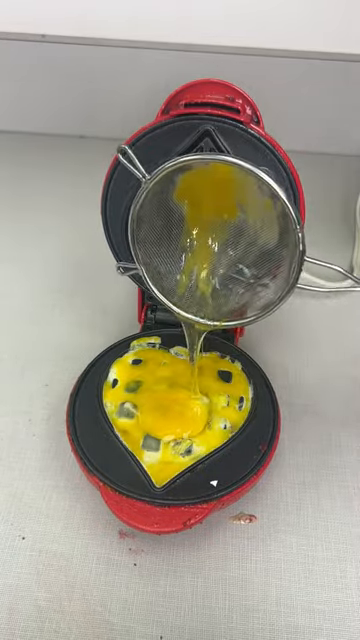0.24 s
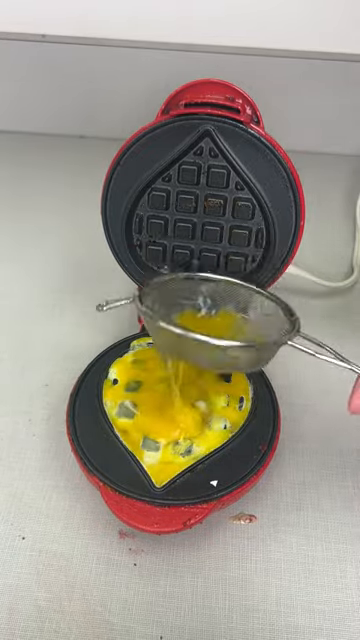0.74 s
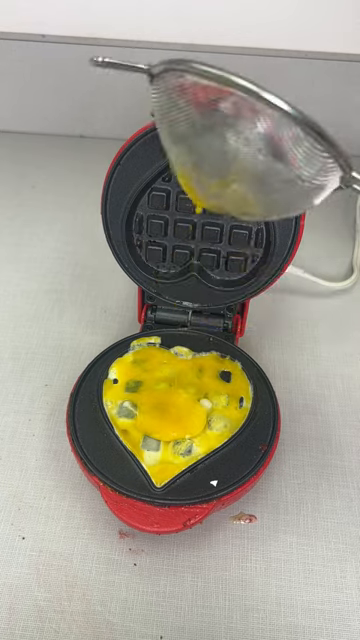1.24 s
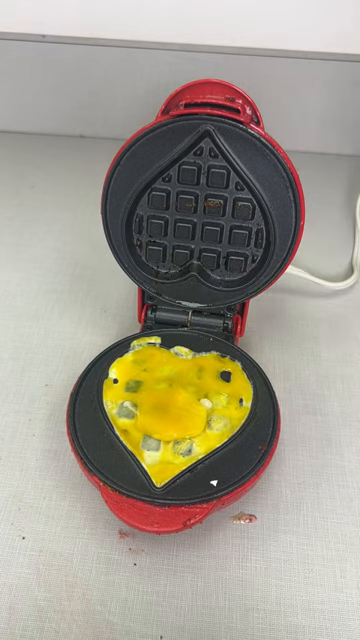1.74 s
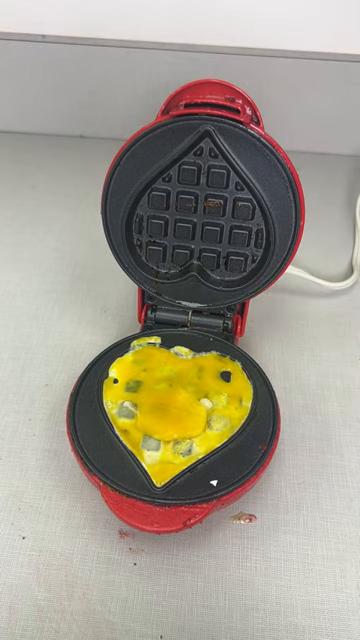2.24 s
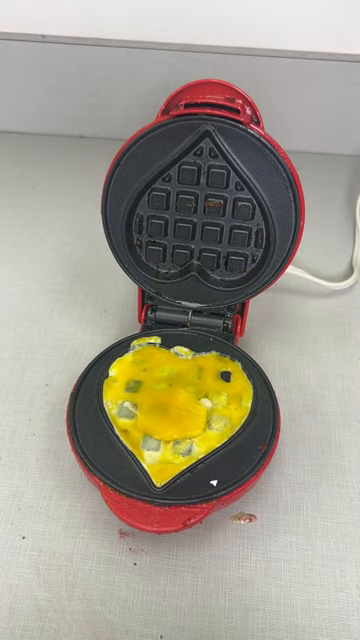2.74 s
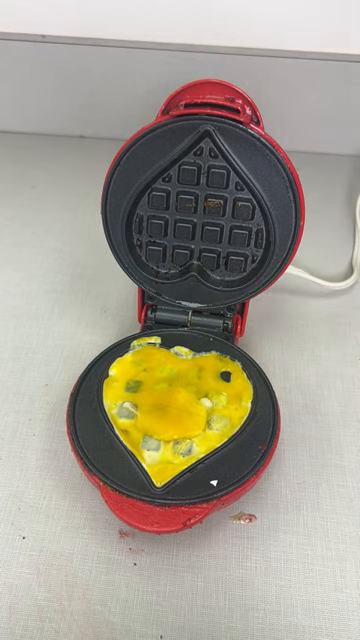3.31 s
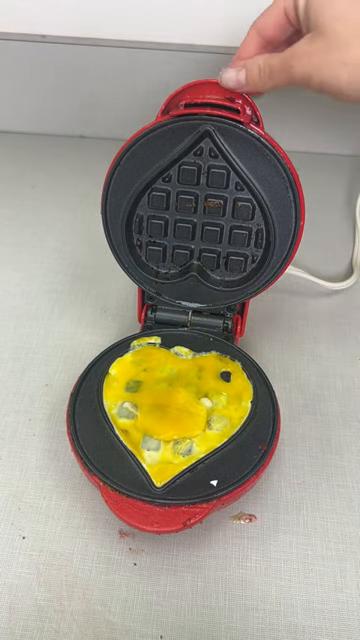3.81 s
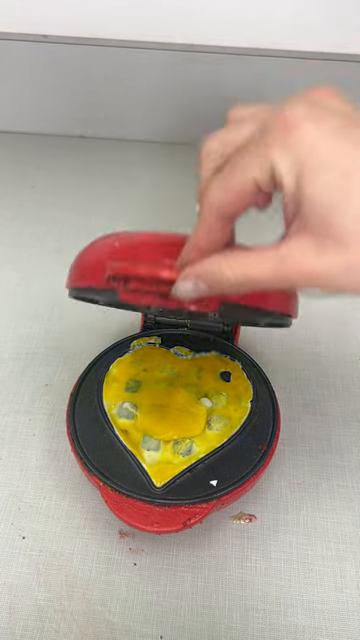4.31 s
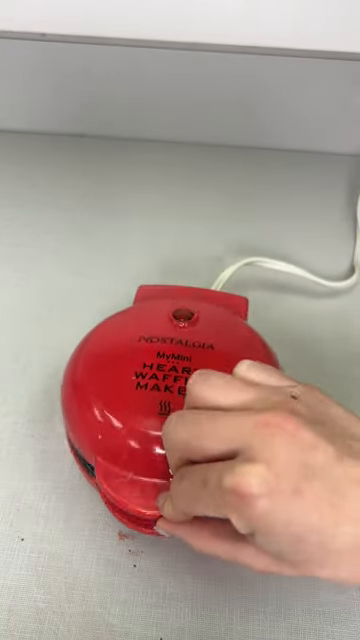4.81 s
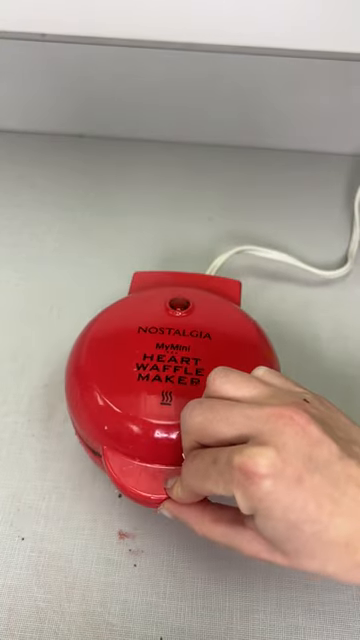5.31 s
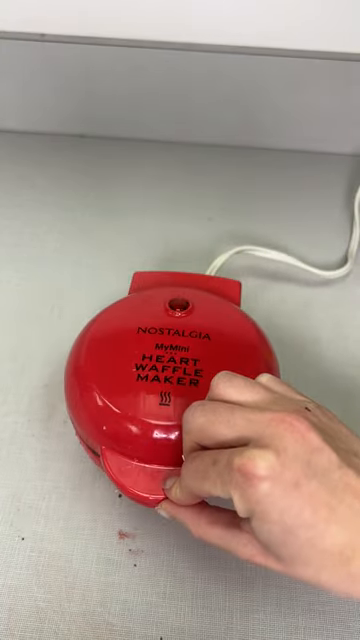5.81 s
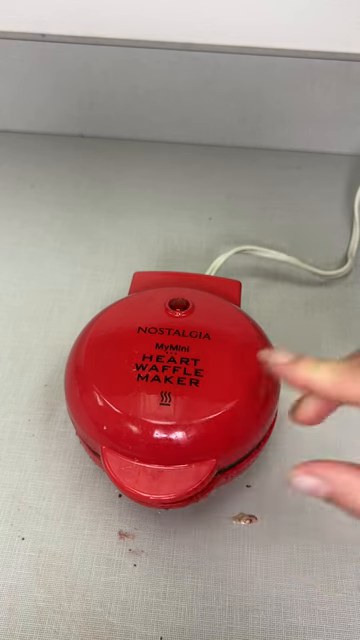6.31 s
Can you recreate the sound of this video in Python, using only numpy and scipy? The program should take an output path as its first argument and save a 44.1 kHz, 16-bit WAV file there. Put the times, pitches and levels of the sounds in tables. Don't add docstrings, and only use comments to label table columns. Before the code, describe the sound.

Close in a small kitchen with a low refrigerator hum, egg crackles weakly on an open hot plate and dies down. A wire sieve scrapes briefly and lands with a bright, sharp clack to the right. A hand knocks a small hollow lid loose and swings it over with light taps. The lid presses the egg; steam hisses and spurts between the metal plates, then fades to a thin sputter.

```python
import sys
import numpy as np
from scipy import signal
from scipy.fft import rfft, irfft, next_fast_len
from scipy.io import wavfile
from scipy.ndimage import uniform_filter1d

SR = 44100
rng = np.random.default_rng(int(sys.argv[2]) if len(sys.argv) > 2 else 0)


def makeup_ratio(level_db):
    decades = np.asarray(level_db, float) / 20
    return 10 ** decades


def inscribe(sig):
    pcm = np.round(np.clip(np.atleast_2d(sig).T, -1, 1) * 32767)
    wavfile.write(sys.argv[1], SR, pcm.astype(np.int16))


N = 288855
SIZE = next_fast_len(N + SR)
HZ = np.maximum(np.fft.rfftfreq(SIZE, 1 / SR), 1)

# pitch in Hz, level in dB per Hz.
SLIDE_TONE = [(240, -32.5), (400, -9), (470, -8.5), (503, -24), (538, -5), (806, -1), (1100, -21.5),
              (1990, -10.5), (10000, -19), (13000, -61), (22000, -120)]
# start in seconds, body in dB, mesh in dB, time to die by 60 dB in s.
SIEVE_CATCHES = [
    (2.709, -45, -52, 0.19),
    (2.748, -51.5, -66, 0.28),
    (2.794, -46.5, -52.5, 0.055),
    (2.808, -55, -46, .03),
    (2.857, -50, -66, 0.07),
    (2.881, -53, -47, 0.099),
]
# time in seconds, peak in dB.
CLACK = [
    (2.9112, -39),
    (2.9134, -16),
    (2.9148, -24),
    (2.9172, -28),
    (2.9222, -28),
    (2.958, -40),
]
# pitch in Hz, level in dB.
SIEVE_WIRE = [(710, -2), (785, -3.5), (1035, 1), (1230, 5.5), (1365, -3), (1590, -4), (1695, 0),
              (2265, 2.5), (2395, 9), (2860, 3), (3425, -2.5), (5250, -1.5), (6500, -21), (7450, -16)]
# pitch in Hz, level in dB, time to die by 60 dB in seconds.
SIEVE_BOWL = [(329.5, -17, 0.24), (502, -34, 0.093)]
# pitch in Hz, level in dB per Hz.
WALL_CRACK = [(150, -6.5), (300, 2), (600, 4.5), (1200, -3), (2800, -1), (4200, -13), (7000, -20.5),
              (15500, -49)]
# time in seconds, force in dB, then rim, fingernail and weight on the counter,
# each in dB over the force.
KNOCKS = [(2.02, -54.5, -24, -16, -12), (3.868, -41, -6.5, -8.5, -3.5), (3.963, -47, -1, -2.5, 11),
          (3.994, -28.5, -7, -34.5, -6), (4.097, -40, -15.5, -30, -1), (4.152, -45, -14.5, -19, 3),
          (4.268, -39, -14, -24, 2), (4.344, -42.5, -14.5, -24, -3), (4.468, -44, -4, -63, -12),
          (6.138, -52.5, -1.5, -18, 6)]
# pitch in Hz, level in dB, time to die by 60 dB in seconds.
LID_SHELL = [(390, -13.5, 0.016), (490, 3, 0.035), (619, -3, 0.032)]
# pitch in Hz, level in dB, time to die by 60 dB in seconds.
LID_RIM = [(798, -2, 0.032), (967, -4, 0.027)]
# pitch in Hz, level in dB, time to die by 60 dB in seconds.
LID_HINGE = [(1260, 0.5, 0.0093), (1670, -9, 0.021), (1990, 0.5, 0.0095)]
# time in seconds, worktop in dB, deep rocking in dB.
THUDS = [(2.749, -51, -61), (2.916, -25.5, -39), (2.949, -30.5, -39), (4.0, -48, -39.5), (4.042, -42, -49),
         (4.77, -46, -51), (4.986, -53, -68), (5.032, -58, -44), (5.07, -43, -44), (5.143, -46.5, -55),
         (6.147, -52, -56)]
# pitch in Hz, level in dB, time to die by 60 dB in seconds.
WORKTOP = [(138, 9.5, 0.14), (197.4, -2, 0.12), (239, -12.5, 0.09), (326.5, -8, 0.11), (415, -19, 0.053)]
# pitch in Hz, level in dB, time to die by 60 dB in seconds.
IRON_ROCKING = [(65, -1, 0.22), (84.7, -1.5, 0.052)]
# time in seconds, level in dB.
STEAM_PRESSURE = [(4.935, -85), (4.958, -62), (4.995, -53), (5.09, -47.5), (5.165, -47.5), (5.2, -50.5),
                  (5.45, -56), (5.95, -66), (6.55, -64.5)]
# pitch in Hz, level in dB per Hz.
STEAM_TONE = [(1060, -107), (1800, -44), (2230, -6), (3320, -1.5), (4460, 5.5), (5130, -0.5), (6550, 1),
              (7050, 3), (10500, -5), (13600, -39), (22000, -120)]
# pitch in Hz, width in Hz, level in dB.
PLATES = [(827, 26, 12.5), (1100, 92, 6.5), (1267, 89, 6.5), (1970, 55, -3), (4080, 34, 7), (4460, 60, 2),
          (6100, 160, 4), (6900, 26, 3), (8120, 240, 3.5), (11170, 140, 2.5)]
# time in seconds, peak in dB, whistle pitch in Hz.
SPURTS = [(4.958, -49, 7400), (4.991, -39, 7240), (5.032, -41, 12400), (5.092, -33.5, 4570),
          (5.151, -33, 4460), (5.624, -44, 6130), (5.647, -42.5, 4450), (5.815, -42.5, 8000),
          (6.05, -52, 11100), (6.129, -42.5, 6260), (6.21, -50.5, 8800), (6.27, -44.5, 4300),
          (6.49, -46, 6200)]
# time in seconds, level in dB.
FRYING = [
    [(0.0, -63.5), (0.31, -62.5), (0.43, -63.5), (0.54, -65), (0.81, -67.5), (2.04, -73.5), (2.68, -73.5)],
    [(3.2, -72), (3.268, -80), (3.51, -75.5), (3.744, -72), (4.184, -78.5), (4.49, -81.5), (4.95, -83.5)],
]
# pitch in Hz, level in dB per Hz.
SIZZLE_TONE = [(880, -61), (1500, -45), (1730, 0), (1840, -6.5), (2000, 3), (2130, -22), (2510, 0.5),
               (2950, -3.5), (4140, -2.5), (5090, -8), (5740, -2), (6620, -4.5), (8330, -9.5), (10000, -28),
               (13000, -37), (22000, -120)]
# time in seconds, peak in dB, brightness in dB over the peak.
POPS = [(0.0732, -51, -13), (0.151, -47, -17), (0.157, -44, -19), (0.2325, -50, -11), (0.2813, -43, -15.5),
        (0.3162, -48, -18), (0.3483, -47.5, -9), (0.3775, -53, -17), (0.4293, -41, -31), (0.4697, -50, -18),
        (0.5065, -45.5, -12), (0.5342, -49.5, -9), (0.618, -46, -11), (0.7701, -48, -30), (0.874, -47, -27),
        (1.2182, -45, -34), (1.4544, -42.5, -41), (1.5753, -45.5, -37), (2.0542, -52.5, -22),
        (2.387, -42.5, -54), (2.5143, -56, -27), (2.6446, -52, -26), (3.1887, -65, -6), (3.2377, -68, -6),
        (3.2909, -46.5, -48), (3.6674, -56, -22), (4.117, -53, -30), (4.2602, -53, -30)]
# pitch in Hz, level in dB rms.
HUM = [(120, -58), (240, -74), (360, -75.5), (600, -81), (720, -80.5), (960, -86.5)]
# pitch in Hz, width in Hz, level in dB rms.
FRIDGE_DRONE = [(65, 2.8, -64.5), (1959, 32, -77)]
# pitch in Hz, level in dB per Hz.
ROOM_RUMBLE = [(15, -46), (25, -7), (122, -5), (145, -15), (173, -12.5), (244, -14.5), (312, -18.5),
               (358, -17), (434, -16), (593, -18.5), (659, -21.5), (719, -20.5), (885, -25), (1600, -32),
               (2080, -52), (3520, -120)]
# pitch in Hz, likeness (1 is the same).
AIR_LIKENESS = [(60, 1), (130, 0.77), (290, 0.63), (640, -1), (1410, 0.48), (3100, 1.07), (6820, 0.5),
                (15000, -5)]
# pitch in Hz, level in dB per Hz.
FAR_FAN = [(820, -22), (1400, -24), (1730, -17), (1880, -19.5), (2080, -5.5), (2520, -11.5), (2790, -12.5),
           (3030, -22), (3740, -17.5), (4920, -38), (8600, -36), (9420, -38.5), (15800, -48)]
# pitch in Hz, time to die by 60 dB in seconds.
KITCHEN_ECHO = [(125, 0.22), (250, 0.65), (500, 0.5), (1000, 0.43), (2000, 0.41), (4000, 0.42),
                (8000, 0.29), (14000, 0.48)]
# pitch in Hz, side minus mid in dB.
PORTS_RIGHT = [(60, -28), (110, -35), (200, -12), (380, -11.5), (700, 2), (1290, -3.5), (2380, -6),
               (4400, -2), (8120, -2.5), (15000, 0)]
# pitch in Hz, side minus mid in dB.
PORTS_FRONT = [(60, -23.5), (110, -50), (200, -19.5), (380, -23), (700, -10.5), (1290, -21), (2380, -17),
               (4400, -8), (8120, -2), (15000, 0)]
# pitch in Hz, phase in radians.
PORT_TURN = [(100, 3.4), (400, 2), (700, 2.2), (1300, 1.94), (2400, 1.57), (4400, 1.46), (15000, 1.63)]


def sieve():
    start_s, attack_s, end_s = 2.702, 0.0039, 3.03
    slide_db, mesh_db = -53.5, -70.5
    body, mesh = gains([(start_s, slide_db - 27, mesh_db - 6),
                        (start_s + attack_s, slide_db, mesh_db),
                        (end_s, slide_db - 13.5, mesh_db)])
    grit = grains(4000 * makeup_ratio(10.0 * drift(30)), 3.4)
    slide = body * rms_one(shaped(grit, makeup_ratio(at_hz(SLIDE_TONE))))
    slide += mesh * rms_one(band(grit, 11300, 15000))
    for s, body_db, catch_mesh_db, t60 in SIEVE_CATCHES:
        slide += band(puffs([s], [body_db], t60), 600, 9000)
        slide += band(puffs([s], [catch_mesh_db], t60), 8900, 17000)

    s, db = np.transpose(CLACK)
    blow_s, blow_db = s[1:2], db[1:2]
    wire_t60_s = 0.03
    wire_modes = [(hz, level_db, wire_t60_s) for hz, level_db in SIEVE_WIRE]
    wire = struck(wire_modes, s, db - 9.0, scatter_db=3.0)
    crack = band(puffs(s, db - 3.5, 0.033), 920, 4860)
    crack += band(puffs(s, db - 15, 0.014), 3600, 16000)
    bowl = band(puffs(s + 0.0013, db - 3, 0.16), 250, 450)
    bowl += struck(SIEVE_BOWL, blow_s + 0.0048, blow_db, 0)
    wall_blow = shaped(clicks(blow_s + 0.0045, blow_db), makeup_ratio(at_hz(WALL_CRACK)))
    return slide + wire + crack + bowl, wall_blow


def lid():
    s, db, rim_db, nail_db, _ = np.transpose(KNOCKS)
    hinge_db = db + 11.5 + rim_db + 0.33 * (nail_db - rim_db)
    shell = struck(LID_SHELL, s, db + 0.5, 1.5)
    shell += struck(LID_RIM, s, db + rim_db + 7, 0.89)
    shell += struck(LID_HINGE, s, hinge_db, 0.52)
    carried = through_counter(band(shell, 250, 1580), path=0.5)
    rattle = band(puffs(s + 0.0054, db + 3.0, 0.073), 440, 820)
    nail = puffs(s, db + nail_db + 12, 0.036)
    nail_click = band(nail, 2200, 3800) + makeup_ratio(-10) * band(nail, 3800, 5700)
    return carried + rattle + nail_click


def counter():
    knock_thuds = []
    for s, force_db, _, _, weight_db in KNOCKS:
        press_db = force_db + weight_db
        knock_thuds.append((s, press_db - 2, press_db + 0.5))
    s, top_db, deep_db = np.transpose(THUDS + knock_thuds)
    boom = struck(WORKTOP, s, top_db - 6.5, scatter_db=0.5)
    boom += struck(IRON_ROCKING, s, deep_db, scatter_db=6.5)
    return through_counter(band(boom, 68, 1400))


def steam():
    hiss, = gains(STEAM_PRESSURE)
    pressure = hiss / makeup_ratio(-52)
    since_press = np.arange(N) / SR - STEAM_PRESSURE[0][0]
    ring = makeup_ratio(np.interp(since_press, [0, 0.7], [-24, -8]))
    sputter = grains(2500 * makeup_ratio(4.5 * drift(25)), 2.43)
    smooth_hiss = 1.1 * rng.standard_normal(N)
    jet = in_front(rms_one(sputter + smooth_hiss), diffuse_db=-3)
    jet = jet * makeup_ratio(1.0 * drift(30))

    plates = 0
    for hz, width, db in PLATES:
        resonance = 1 / (1 + (2 * (HZ - hz) / width) ** 2)
        plates = plates + makeup_ratio(db + 2.7 * drift(5)) * shaped(jet, resonance)
    plates = rms_one(plates) * ring * makeup_ratio(1.9 * drift(8))
    rush = rms_one(shaped(jet, makeup_ratio(at_hz(STEAM_TONE))))
    main = makeup_ratio(3.0) * hiss * (rush + plates)
    shudder = makeup_ratio(-62.5) * pressure ** 1.8 * rms_one(band(band(jet, 88, 180), 88, 184))
    gurgle = makeup_ratio(-57) * pressure ** 0.99 * rms_one(band(jet, 310, 3430))
    fine = makeup_ratio(-54 + 1.4 * drift(12)) * pressure ** 1.3 * rms_one(band(jet, 10700, 19000))
    return main + shudder + gurgle + fine + spurts()


def spurts():
    burst_t60_s, whistle_t60_s, attack_s = 0.039, 0.03, 0.003
    width = 0.076
    s, db, _ = np.transpose(SPURTS)
    out = band(puffs(s, db - 4, burst_t60_s, attack_s), 1700, 8800)
    for s, db, hz in SPURTS:
        breath = puffs([s], [db + 5], whistle_t60_s, attack_s)
        out += band(breath, hz * (1 - width), hz * (1 + width))
    return ports(out, PORTS_FRONT)


def frying():
    sizzle, = gains(np.concatenate(FRYING))
    vigour = sizzle / makeup_ratio(-64)
    spit = makeup_ratio(-73.5) * vigour ** 1.8 + makeup_ratio(-81) * vigour ** 0.28
    fizz = in_front(grains(3500 * makeup_ratio(2.0 * drift(25)), 2.5), diffuse_db=-0.5)
    body = rms_one(shaped(fizz, makeup_ratio(at_hz(SIZZLE_TONE))))
    upper = shaped(body, 1 / (1 + (5090 / HZ) ** 12))
    top = shaped(body, 1 / (1 + (7240 / HZ) ** 12))
    patch_db = 2.5
    upper_patches = (upper - top) * makeup_ratio(patch_db * drift(6))
    top_patches = top * makeup_ratio(1.5 + patch_db * drift(4)) * (vigour * makeup_ratio(5)) ** 0.38
    body = body - upper + upper_patches + top_patches
    fine = rms_one(band(band(fizz, 6300, 19000), 5800, 26000)) * makeup_ratio(1.7 * drift(15))
    return makeup_ratio(2) * sizzle * body + spit * fine + ports(pops(POPS), PORTS_FRONT)


def pops(rows):
    s, peak_db, bright_db = np.transpose(rows)
    t60_s = 0.011
    low = band(puffs(s, peak_db, t60_s), 1760, 4400)
    middle = band(puffs(s, peak_db + 0.57 * bright_db + 11, t60_s), 5100, 8100)
    high = band(puffs(s, peak_db + bright_db + 10.5, t60_s), 7500, 16000)
    return low + middle + high


def fridge():
    t = np.arange(N) / SR
    hum = np.zeros(N)
    for hz, db in HUM:
        hum += makeup_ratio(db + 4 + 1.0 * drift(4)) * np.sin(2 * np.pi * hz * t + rng.uniform(0, 4.9))
    hum = hum * makeup_ratio(np.array([[-0.3], [0.3]]))
    air = spread(rng.standard_normal(N), AIR_LIKENESS)
    drone = 0
    for hz, width, db in FRIDGE_DRONE:
        drone = drone + makeup_ratio(db) * rms_one(shaped(air, 1 / (1 + ((HZ - hz) / width) ** 2)))
    rumble = rms_one(shaped(air, makeup_ratio(at_hz(ROOM_RUMBLE))))
    fan = rms_one(shaped(air, makeup_ratio(at_hz(FAR_FAN)))) * makeup_ratio(0.27 * drift(0.4))
    return hum + drone + makeup_ratio(-60) * rumble + makeup_ratio(-72) * fan


def kitchen(x):
    t = np.arange(SR) / SR
    white = rng.standard_normal((2, SR)) * np.clip((t - 0.003) / 0.0021, 0, 1)
    tail = 0
    for hz, t60 in KITCHEN_ECHO:
        tail = tail + band(white, hz / np.sqrt(2), hz * np.sqrt(2)) * makeup_ratio(-60 * t / t60)
    mono_bass = band(tail.mean(axis=0), 40, 340)
    return shaped(x, rfft(band(tail, 404, 18000) + mono_bass, SIZE))


def through_counter(x, path=1):
    travel_s = 0.01229
    lead = travel_s * np.sqrt(100 / 3000)
    turns = path * (2 * travel_s * np.sqrt(100 * HZ) - lead * HZ)
    return shaped(x, np.exp(-2j * np.pi * turns))


def ports(x, side_db):
    side = shaped(x, makeup_ratio(at_hz(side_db)) * np.exp(1j * at_hz(PORT_TURN)))
    return x + side * [[1], [-1]]


def in_front(x, diffuse_db):
    scattered = band(rng.standard_normal((2, N)), 4700, 21000)
    return ports(x, PORTS_FRONT) + makeup_ratio(diffuse_db) * scattered


def spread(mid, likeness):
    alike = np.clip(at_hz(likeness), 0, 1)
    side = shaped(rng.standard_normal(N), np.sqrt(1 - alike))
    return shaped(mid, np.sqrt(1 + alike)) + side * [[1], [-1]]


def struck(modes, seconds, db, scatter_db):
    out = np.zeros(N)
    luck = rng.standard_normal((len(seconds), len(modes)))
    for k, (hz, level_db, t60) in enumerate(modes):
        r = makeup_ratio(-60 / (t60 * SR))
        w = 2 * np.pi * hz / SR
        blows = clicks(seconds, np.add(db, level_db + scatter_db * luck[:, k]))
        ringing = signal.lfilter([0, np.sin(w)], [1, -2 * r * np.cos(w), r * r], blows + 1e-18)
        out += (-1) ** k * ringing
    return out


def puffs(seconds, db, t60, attack_s=0):
    decay = makeup_ratio(-60 / (t60 * SR))
    envelope = signal.lfilter([1], [1, -decay], clicks(seconds, db) + 1e-18)
    rise = int(attack_s * SR) + 1
    return signal.lfilter(np.ones(rise) / rise, [1], envelope) * rng.standard_normal(N)


def clicks(seconds, db):
    out = np.zeros(N)
    np.add.at(out, (np.asarray(seconds) * SR).astype(int), makeup_ratio(np.asarray(db)))
    return out


def grains(per_s, spread_db):
    sizes = makeup_ratio(spread_db * np.minimum(rng.exponential(1, N), 5)) * rng.choice([-1, 1], N)
    return rms_one(sizes * (rng.random(N) < per_s / SR))


def drift(rate):
    steps = rng.standard_normal(int(N / SR * 60) + 2)
    smooth = uniform_filter1d(steps, size=max(int(30 / rate), 1))
    return np.interp(np.arange(N) / SR * 60, np.arange(len(steps)), rms_one(smooth))


def gains(rows):
    s, *columns = np.transpose(rows)
    t = np.arange(N) / SR
    return [makeup_ratio(np.interp(t, s, c, left=-150, right=-150)) for c in columns]


def at_hz(points):
    hz, values = np.array(points).T
    return np.interp(np.log(HZ), np.log(hz), values)


def shaped(x, response):
    return irfft(rfft(x, SIZE) * response, SIZE)[..., :N]


def band(x, low_hz, high_hz):
    sos = signal.butter(2, [low_hz, min(high_hz, 0.45 * SR)], "band", fs=SR, output="sos")
    return signal.sosfilt(sos, x + 1e-18)


def rms_one(x):
    return x / np.sqrt(np.mean(x ** 2) + 1e-20)


def scene():
    clatter, wall_blow = sieve()
    shell = lid()
    boom = counter()
    room = kitchen(makeup_ratio(-40.5) * clatter + makeup_ratio(1.0) * wall_blow + makeup_ratio(-35) * shell + makeup_ratio(-41.0) * boom)
    right = ports(clatter + boom, PORTS_RIGHT)
    hand = ports(shell, PORTS_FRONT) * makeup_ratio(np.array([[-0.8], [0.8]]))
    return right + hand + room + steam() + frying() + fridge()


def top_cut(x):
    return signal.sosfilt(signal.butter(12, 16650, fs=SR, output="sos"), x)


def record(dry):
    bass_cut = signal.butter(4, 42, "high", fs=SR, output="sos")
    top_edge = signal.cheby2(20, 50, 15750 * 1.015, fs=SR, output="sos")
    mix = signal.sosfilt(top_edge, signal.sosfilt(bass_cut, dry))
    return top_cut(mix)


dry = scene()
out = record(dry)
inscribe(out)
```